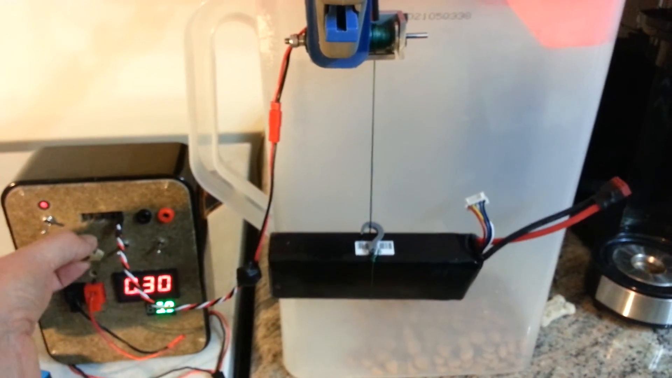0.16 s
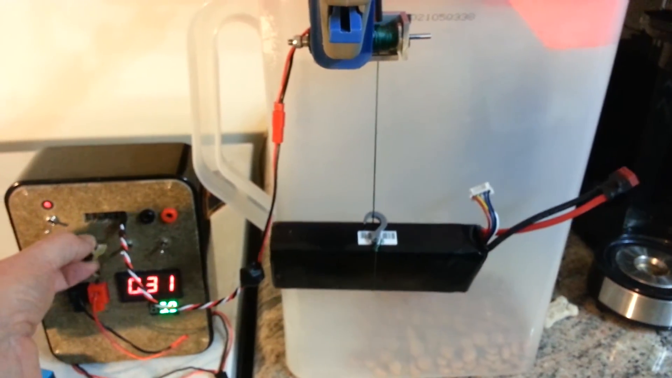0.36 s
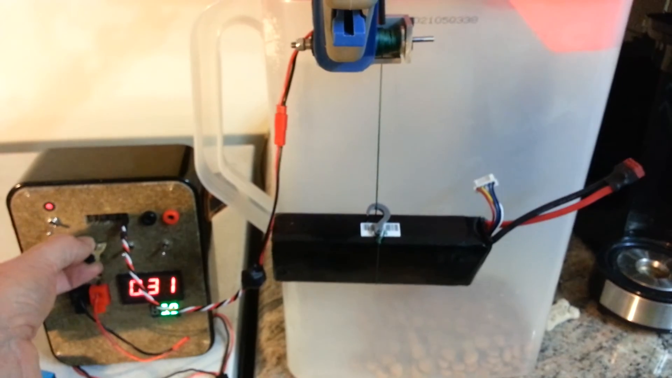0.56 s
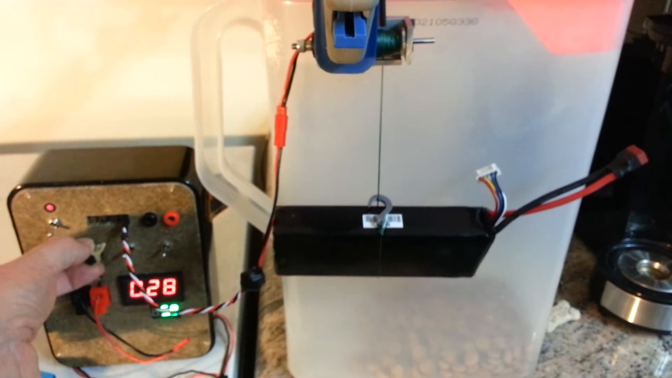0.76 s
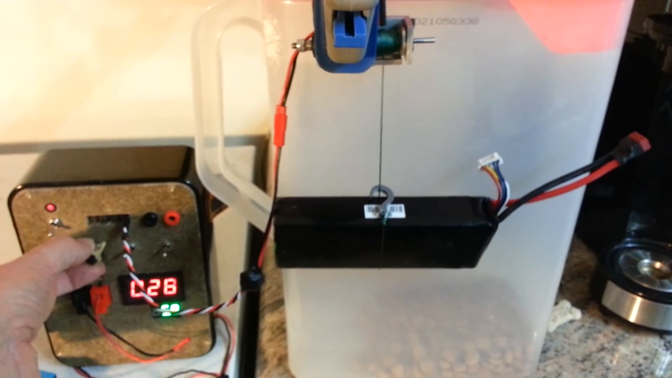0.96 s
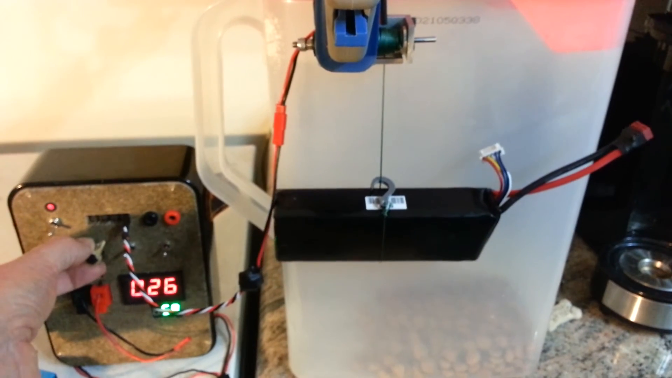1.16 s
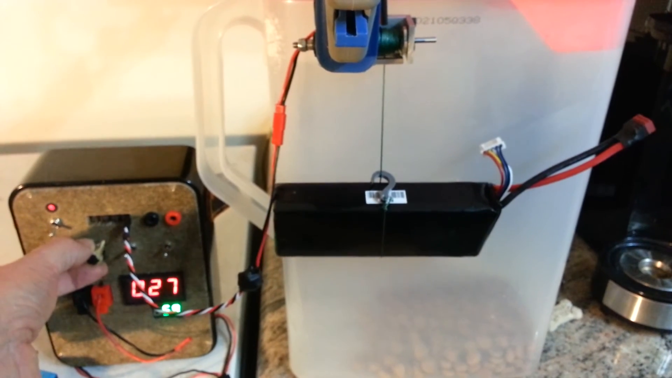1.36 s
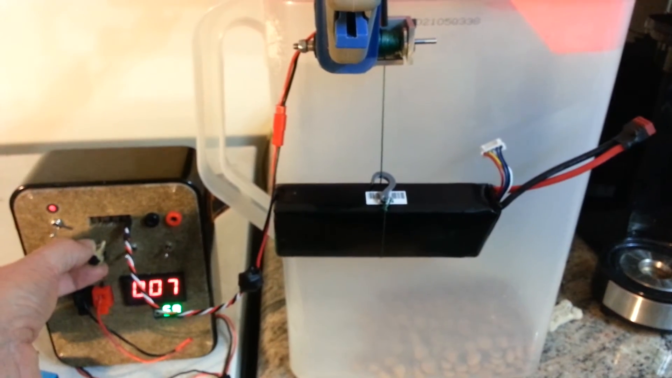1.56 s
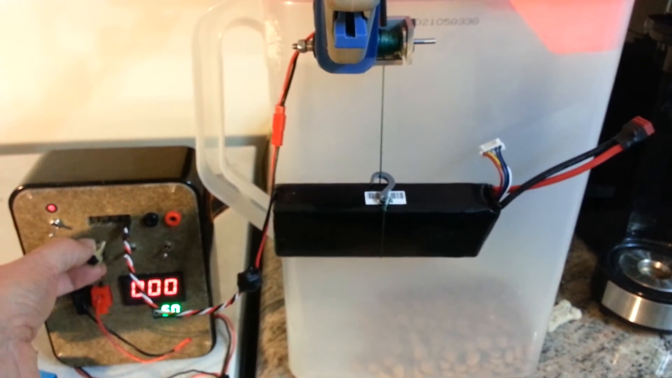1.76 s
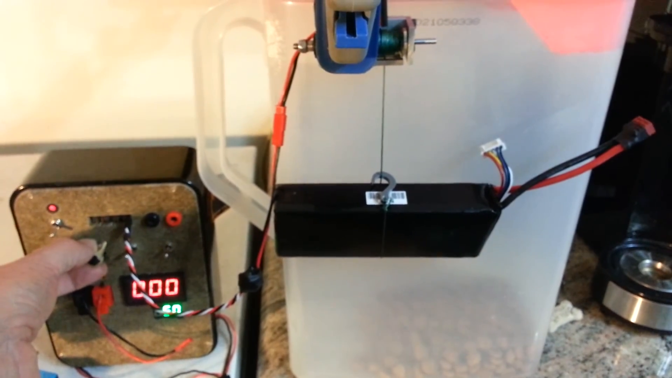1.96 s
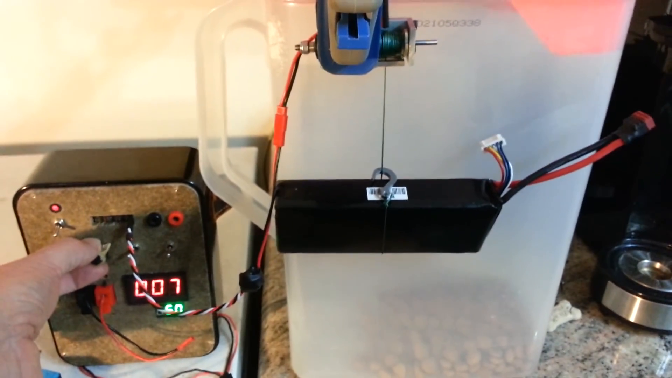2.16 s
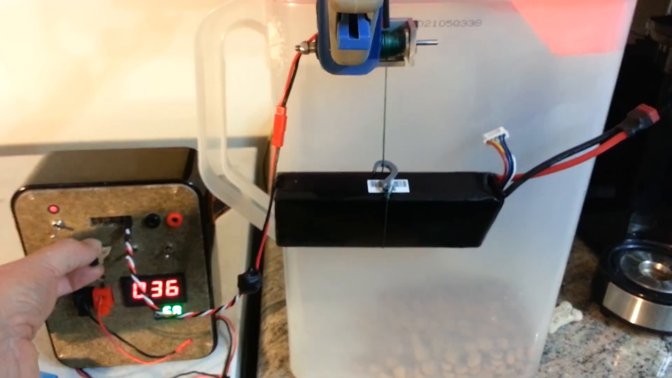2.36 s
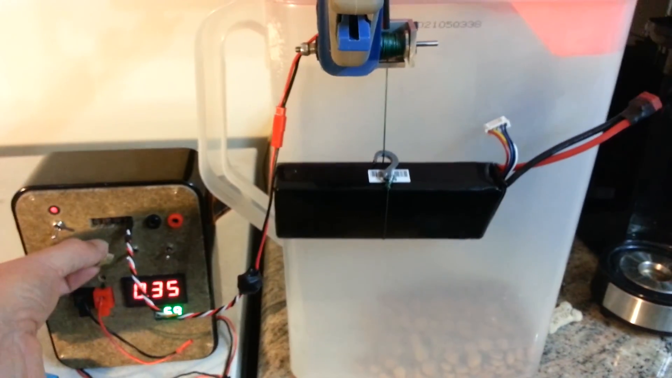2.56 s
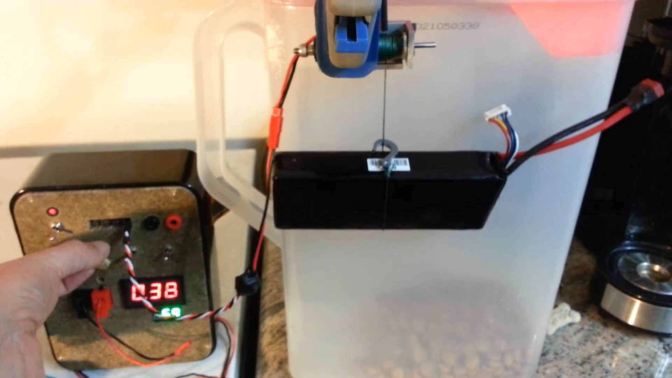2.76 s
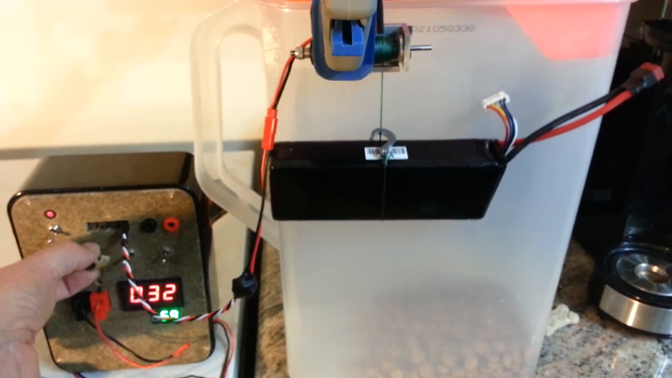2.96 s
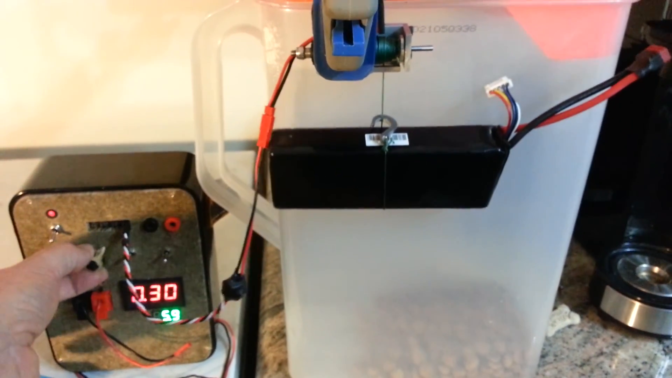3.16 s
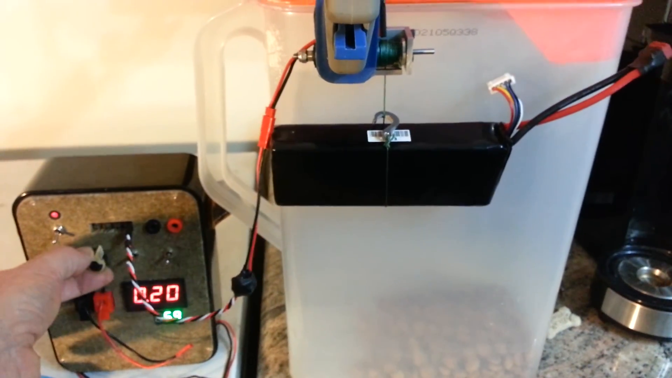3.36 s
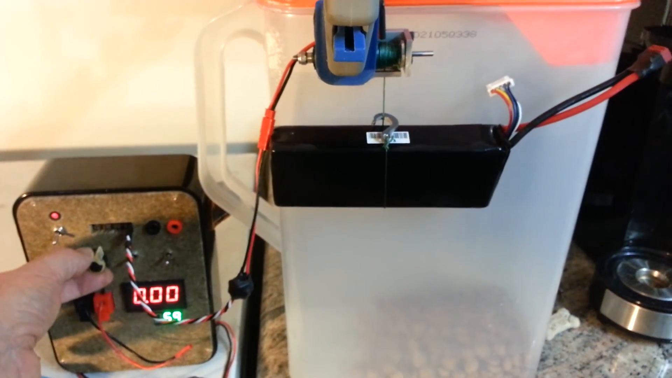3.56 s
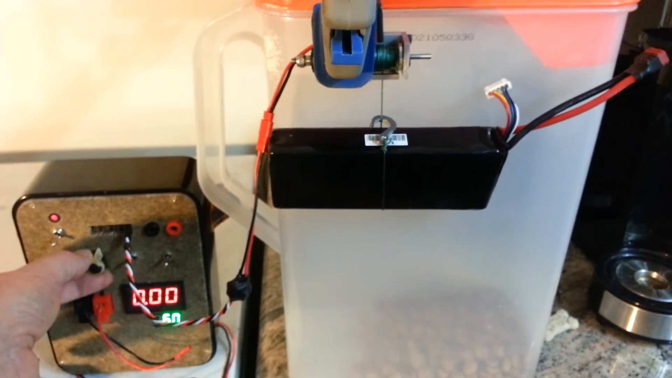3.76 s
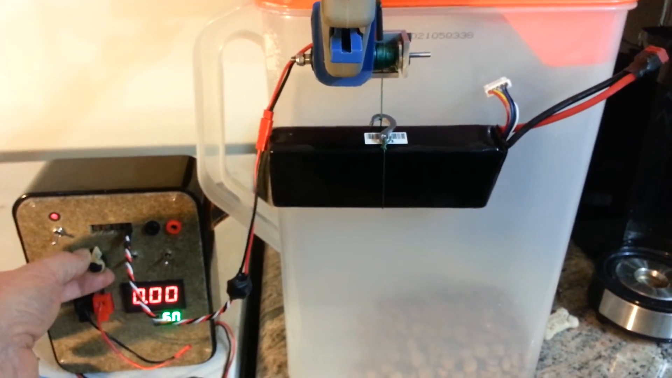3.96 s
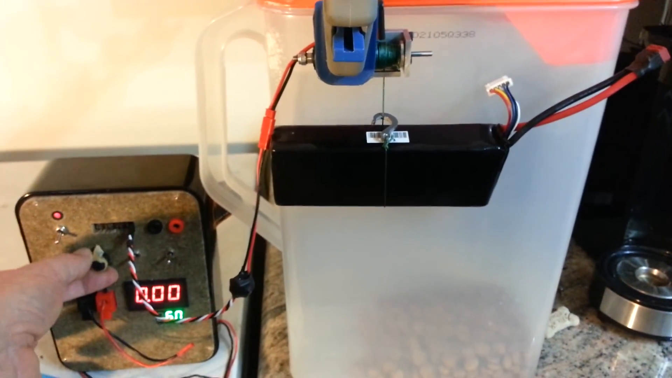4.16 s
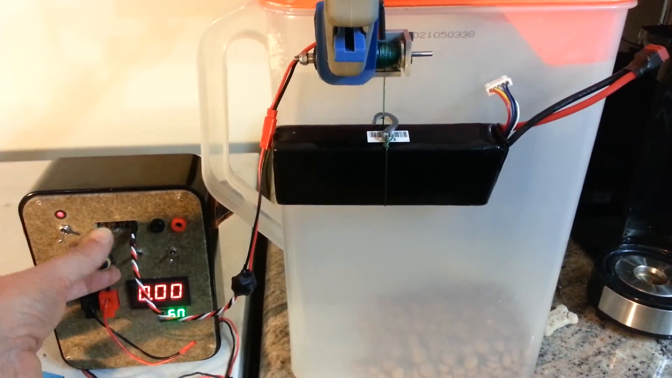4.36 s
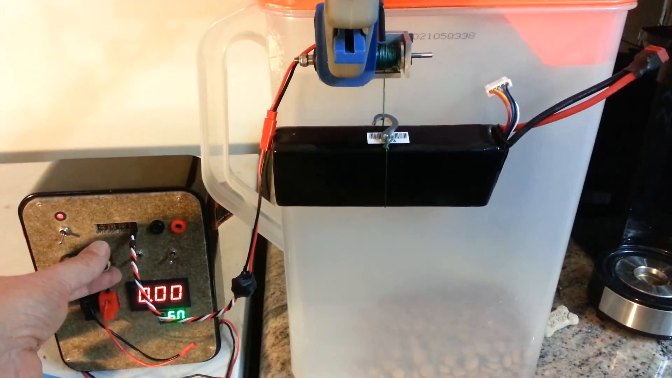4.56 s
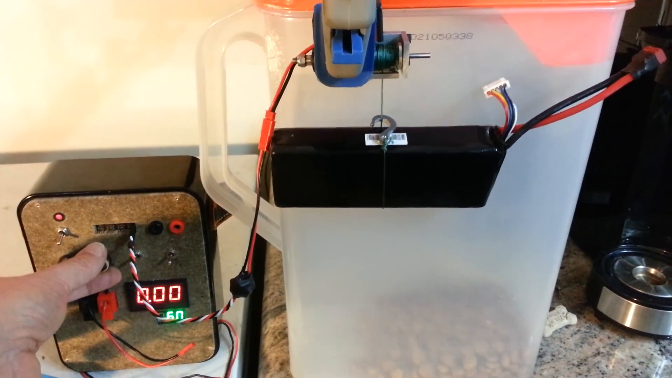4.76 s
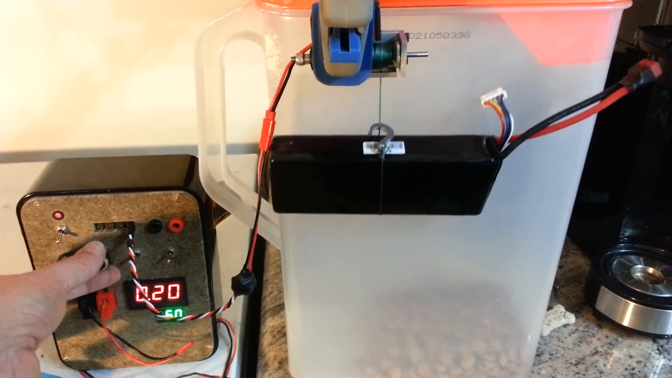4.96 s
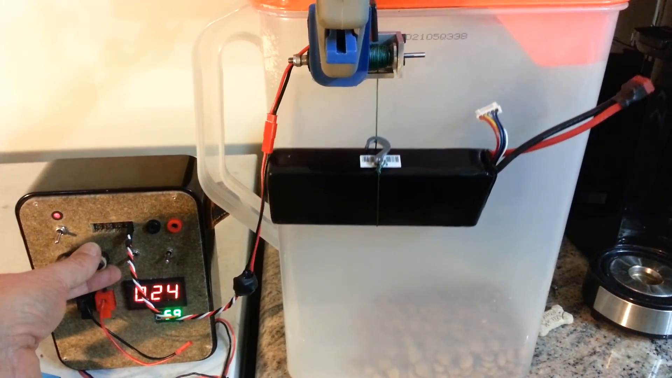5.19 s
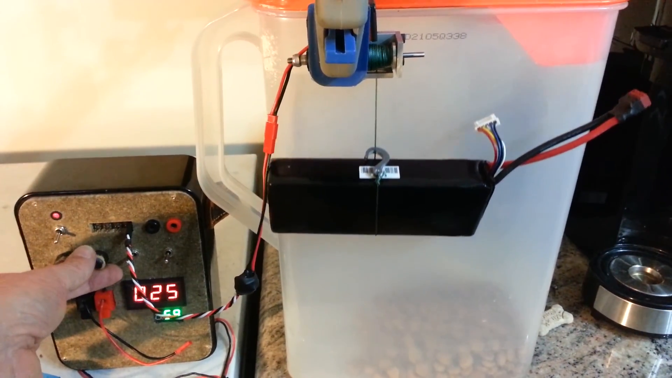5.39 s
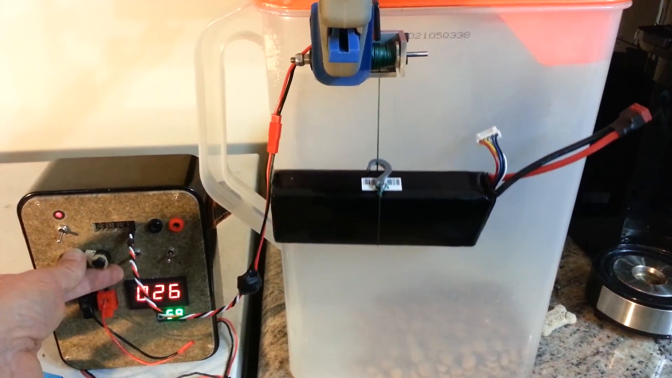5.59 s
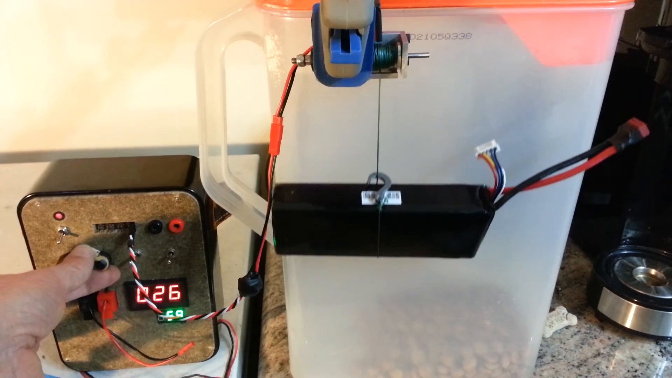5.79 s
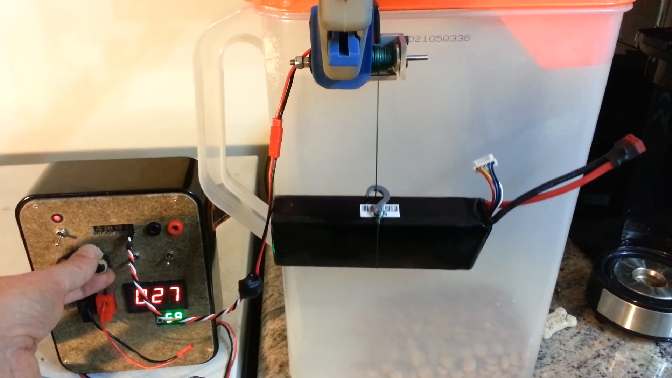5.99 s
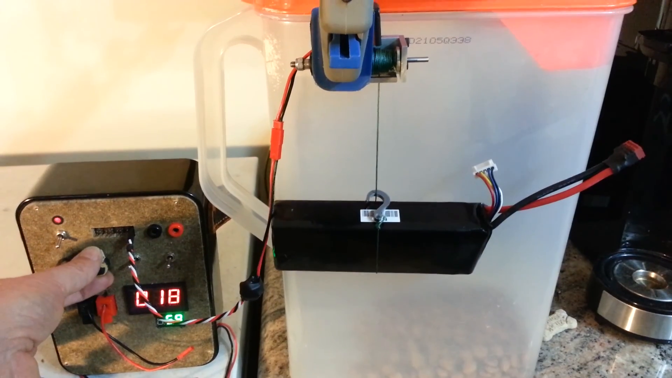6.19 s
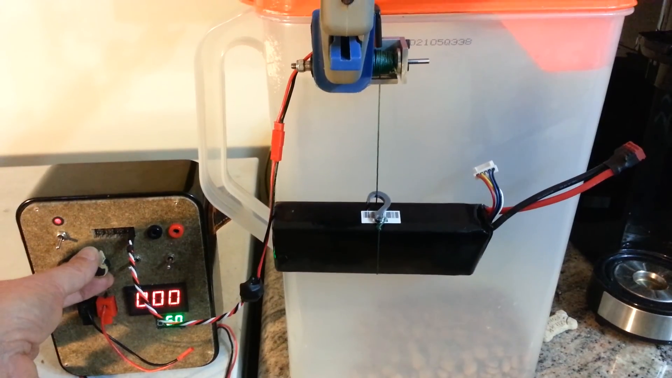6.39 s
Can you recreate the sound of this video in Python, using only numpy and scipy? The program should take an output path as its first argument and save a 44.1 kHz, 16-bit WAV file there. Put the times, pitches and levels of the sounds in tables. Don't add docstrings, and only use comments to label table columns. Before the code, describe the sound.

A small geared electric winch, close to a stereo microphone in a quiet kitchen, is already running at the start with a bright, nasal whine near 3 kHz, dry gear rattle and fine brush hiss. From about 0.5 s its pitch sags in steps, turning into a rough, fluttering buzz, with a faint low bump near 0.8 s, and stops at 1.35 s. Soft appliance hum, room air and a faint once-a-second clock tick remain. At 1.95 s it groans back to life, slow and pulsing, climbs to a steady high whine by 2.7 s, then drops and cuts off at 3.3 s. Quiet follows until 4.73 s, when it runs the other way: louder, looser, more clattering, rising to a high whine by 5.5 s, a small dull knock around 5.6 s, then falling quickly and stopping at 6.1 s. Short room echoes fade into quiet.

```python
import sys
import numpy as np
from scipy import signal
from scipy.fft import rfft, irfft, next_fast_len
from scipy.io import wavfile
from scipy.ndimage import uniform_filter1d

SR = 44100
rng = np.random.default_rng(int(sys.argv[2]) if len(sys.argv) > 2 else 0)


def to_wav(s):
    ch = np.atleast_2d(s).T
    pcm = np.round(np.clip(ch, -1, 1) * 32767)
    wavfile.write(sys.argv[1], SR, pcm.astype(np.int16))


def gain_from_db(level_db):
    decades = np.asarray(level_db, float) / 20
    return 10 ** decades


N = 283563
TIME = np.arange(N) / SR
REVERSE_S = 4
FREE_HZ = 305
PINION_TEETH, SECOND_MESH, WHEEL = 10, 1.64, .49


def rms_one(x):
    return x / np.sqrt(np.mean(x ** 2) + 1e-20)


def by_way(winding, paying):
    return np.where(TIME < REVERSE_S, winding, paying)


def in_time(runs):
    s, value = np.transpose(np.vstack(runs))
    return np.interp(TIME, s, value)


def at_hz(points, hz):
    point_hz, value = np.transpose(points)
    return np.interp(np.log(hz + 1), np.log(point_hz), value)


def resonance(hz, centre_hz, width_hz):
    return 1 / (1 + (2 * (hz - centre_hz) / width_hz) ** 2)


def filtered(x, response):
    size = next_fast_len(N + SR)
    hz = np.arange(size // 2 + 1) * SR / size
    return irfft(rfft(x, size) * response(hz), size)[..., :N]


def causal(gain):
    both_sides = np.log(np.r_[gain, gain[-2:0:-1]])
    phase = np.imag(signal.hilbert(both_sides))[:len(gain)]
    return gain * np.exp(-1j * phase)


def drift(rate):
    r = np.exp(-2 * np.pi * rate * 32 / SR)
    slow = signal.lfilter([1], [1, -2 * r, r * r], rng.standard_normal(N // 32 + 1002))[1000:]
    return np.interp(np.arange(N) / 32, np.arange(len(slow)), rms_one(slow))


def ring(clicks, hz, t60):
    r, w = gain_from_db(-60 / (t60 * SR)), 2 * np.pi * hz / SR
    return signal.lfilter([0, np.sin(w)], [1, -2 * r * np.cos(w), r * r], clicks + 1e-18)


def winch():
    turns_hz, rattle_db = in_time(RUNS), in_time(RATTLE)
    hum_db, tooth_db, octave_db = tones_db(turns_hz)
    idle = np.clip(1 - turns_hz / FREE_HZ, 0, 1)
    speed, angle, cycle, flutter = pulsed_rotor(turns_hz, idle)
    tooth = tooth_whine(angle, tooth_db) * np.clip(turns_hz / 60 - 1.8, 0, 1)
    overtones = tooth_overtones(angle, speed, octave_db) * (1 + 3 * flutter)
    second = second_gear(angle, rattle_db) * (turns_hz / FREE_HZ) ** by_way(6, 2)
    whine = gain_from_db(.3) * tooth + gain_from_db(-.3) * overtones + second
    gears = gain_from_db(-3.5) * rattle(turns_hz, rattle_db, angle, cycle, idle) + groan() + running() * whine
    return gears, running() * gain_from_db(hum_db + 2.5) * np.sin(angle)


# time in seconds, rotor turns per second.
RUNS = [
    [(0.0, 301), (.36, 296), (.52, 284), (.64, 256), (.8, 246), (.96, 230), (.992, 193), (1.26, 188),
     (1.345, 137)],
    [(1.9524, 62), (2.17, 174), (2.33, 204), (2.385, 232), (2.66, 299), (3.0, 303.5), (3.145, 293),
     (3.22, 249), (3.288, 165)],
    [(4.7295, 135), (4.87, 228), (5.1, 249), (5.34, 254), (5.41, 281), (5.53, 291.5), (5.86, 289.5),
     (5.97, 243), (6.088, 182)],
]


def running():
    return sum((TIME >= run[0][0]) * np.clip((run[-1][0] - TIME) / 0.0042 + 1, 0, 1) for run in RUNS)


def pulsed_rotor(turns_hz, idle):
    pulse_hz = 61.45
    starts = np.array([run[0][0] for run in RUNS])
    latest = starts[np.searchsorted(starts, TIME, "right") - 1]
    cycle = (TIME - latest) * pulse_hz % 1
    flutter = by_way(.19, .18) * idle * signal.sawtooth(2 * np.pi * cycle, .22)
    speed = turns_hz * (1 + flutter + by_way(.002, .01) * drift(40))
    angle = 2 * np.pi * np.cumsum(speed) / SR
    return speed, angle, cycle, flutter


# rotor turns per second, rotor hum in dB, tooth whine in dB,
# its octave in dB winding in, its octave in dB paying out.
RADIATION = [(136, -69, -68, -67, -60), (166.7, -64, -63.5, -38, -35), (189, -50, -53, -28, -31),
             (239.5, -50.5, -41.5, -30.5, -26), (253.4, -52.5, -39, -31.5, -25.5),
             (276.8, -43, -41.5, -37.5, -26), (292, -39.5, -34, -46, -29), (301.4, -37.5, -31, -43.5, -30)]


def tones_db(turns_hz):
    at, *columns = np.transpose(RADIATION)
    hum_db, tooth_db, in_db, out_db = [np.interp(turns_hz, at, c) for c in columns]
    return hum_db + by_way(0, -4.5), tooth_db + by_way(0, 1), by_way(in_db, out_db)


def line(order, angle, db, waver_db):
    level = gain_from_db(db + waver_db * drift(35))
    return level * np.sqrt(2) * np.sin(order * angle + rng.uniform(0, 6.25))


SIDEBAND_ORDERS = [0, -1, 1, -SECOND_MESH, SECOND_MESH, 2 * SECOND_MESH, 3 * SECOND_MESH, -WHEEL, WHEEL]
# level in dB winding in, level in dB paying out.
SIDEBANDS = [(0, 0), (-24, -20), (-9, -9), (-22, -20), (-9, -12), (-13, -3), (-15, -6), (-25, -14),
             (-12, -8)]


def tooth_whine(angle, tooth_db):
    return sum(line(PINION_TEETH + off, angle, tooth_db + by_way(in_db, out_db), 2.5 if off else .8)
               for off, (in_db, out_db) in zip(SIDEBAND_ORDERS, SIDEBANDS))


# distance in rotor multiples, level in dB.
OVERTONE_SIDEBANDS = [(0, 0), (-SECOND_MESH, -14), (SECOND_MESH, -16), (-WHEEL, -10), (WHEEL, -10)]
# frequency in Hz, level in dB.
THIRD = [(3000, 4.5), (5000, 2), (6000, -18), (7200, -13), (9000, -42.5)]


def tooth_overtones(angle, speed, octave_db):
    third_db = octave_db + at_hz(THIRD, 3 * PINION_TEETH * speed)
    total = 0
    for off, db in OVERTONE_SIDEBANDS:
        slack_db = by_way(0, 5 * bool(off))
        total = total + line(2 * PINION_TEETH + off, angle, octave_db + db + slack_db, by_way(0.96, 3.5))
        total = total + line(3 * PINION_TEETH + off, angle, third_db + db, 3.3)
    return total


# level in dB winding in, level in dB paying out.
SECOND_GEAR_DB = [(-43, -46), (-31, -35), (-31, -43), (-33, -42)]


def second_gear(angle, rattle_db):
    return sum(line((k + 1) * SECOND_MESH, angle, rattle_db + by_way(*db), 3)
               for k, db in enumerate(SECOND_GEAR_DB))


# frequency in Hz, level in dB per Hz.
CASE = [(300, -20.5), (500, -18), (650, -24.5), (900, -19), (1150, -24), (1450, -19.5), (2000, -13.5),
        (2500, -22), (3200, -5), (5100, 6), (6400, -2), (10200, -24.5), (11100, -30.5), (12300, -29),
        (14300, -76)]
# frequency in Hz, width in Hz, height in dB.
RINGS = [(780, 550, 2.5), (2438, 500, 16.5), (3060, 125, 8), (3350, 240, 7.5), (3648, 68, 10),
         (3968, 144, 8), (4590, 92, 5.5), (5066, 73, 6), (5690, 200, 2.5), (7100, 170, 6)]


def case_gain(hz):
    rings_db = sum(db * resonance(hz, ring_hz, width_hz) for ring_hz, width_hz, db in RINGS)
    return causal(rms_one(gain_from_db(at_hz(CASE, hz) + rings_db)))


# time in seconds, level in dB.
RATTLE = [
    [(0.0, -26.5), (.5, -28), (.96, -29.5), (1.02, -30.5), (1.345, -29.5)],
    [(1.953, -45), (2.04, -31), (2.14, -27.5), (2.32, -28.5), (2.45, -28.5), (3.15, -27), (3.288, -31)],
    [(4.731, -42), (4.8, -28), (4.96, -21), (5.3, -23), (5.4, -22.5), (5.85, -22), (5.97, -23.5),
     (6.088, -27.5)],
]


def rattle(turns_hz, rattle_db, angle, cycle, idle):
    push = 1 + np.clip(1.35 * idle ** 2, 0, .9) * (3 * np.exp(-3.5 * cycle) - 1)
    gate = np.exp(.5 * np.cos(SECOND_MESH * angle) + 0.07 * np.cos(angle) + 0.063 * np.cos(WHEEL * angle))
    knocking = rms_one(rng.standard_normal(N) * gate * push)
    knocking = filtered(running() * gain_from_db(rattle_db + 1.74 * drift(8.5)) * knocking, case_gain)
    low = filtered(knocking, lambda hz: 1 / (1 + (hz / 1760) ** 4))
    share_gone = by_way(0, 0.28) + 0.0036 * (turns_hz - 200)
    return knocking - np.clip(share_gone, -.4, .8) * low


def groan():
    since = [TIME - run[0][0] for run in RUNS[1:]]
    swell = sum(np.clip(t / 0.019, 0, 1) * np.exp(-(np.maximum(t, 0) / 0.15) ** 2) for t in since)
    tone = filtered(rng.standard_normal(N), lambda hz: resonance(hz, 836, 240))
    return gain_from_db(-57) * swell * rms_one(tone)


# frequency in Hz, level in dB per Hz.
BRUSHES = [(5000, -18), (7000, -19), (9500, -7.5), (10800, -11), (12000, -2.5), (13500, -29.5)]


def brushes():
    level_db = by_way(-51, -57) + 30 * np.log10(in_time(RUNS) / FREE_HZ)
    hiss = filtered(rng.standard_normal((2, N)), lambda hz: gain_from_db(at_hz(BRUSHES, hz)))
    return running() * gain_from_db(level_db) * rms_one(hiss)


# time in seconds, level in dB, frequency in Hz, time to fade by 60 dB in seconds.
KNOCKS = [
    (.787, -31, 250, 0.028),
    (5.636, -34.5, 336, 0.052),
    (5.633, -31.5, 1700, 0.016),
]


def knocks():
    return sum(-gain_from_db(db) * ring(np.arange(N) == round(s * SR), hz, t60) for s, db, hz, t60 in KNOCKS)


# frequency in Hz, left minus right in dB.
SIDE_DB = [(60, 7), (110, -2.5), (200, -22), (370, -29), (670, 11.5), (1230, -13.5), (2260, 3),
           (4130, -3.5), (7570, 0.5), (13800, 36)]


def to_ports(x):
    side = np.array([[.5], [-.5]])
    lag_s = 2.5 / SR
    return filtered(x, lambda hz: gain_from_db(side * at_hz(SIDE_DB, hz)) * np.exp(-2j * np.pi * hz * side * lag_s))


# frequency in Hz, level in dB.
ROOM = [(200, -22), (600, 5.5), (1200, 2.5), (2500, -2.5), (5000, -14), (8000, 0.5), (12000, 6.5)]


def kitchen(x):
    t = TIME[:SR // 2]
    tail = rng.standard_normal((2, len(t))) * gain_from_db(-60 * t / 0.26) * (t > .003)
    tail = tail / np.sqrt(np.sum(tail[0] ** 2))
    echoes = signal.fftconvolve(x[None], tail, axes=1)[:, :N]
    return filtered(echoes, lambda hz: gain_from_db(at_hz(ROOM, hz)))


# frequency in Hz, level in dB, time to fade by 60 dB in seconds.
CLOCK = [(1000, -9, .04), (2385, -5, .018), (3200, -7, .012), (4000, -5, .015), (5420, -7, .012),
         (6800, -5, .012)]


def clock():
    first_s, every_s, scratch_s = .597, 1.0, 0.045
    since = (TIME - first_s) % every_s / scratch_s
    swell = np.sqrt(np.sin(np.pi * np.minimum(since, 1) ** 0.4).clip(0))
    scratch = gain_from_db(-60.5) * swell * rng.standard_normal(N)
    direct = filtered(scratch, lambda hz: 1 / (1 + (1500 / (hz + 1)) ** 4) / (1 + (hz / 7500) ** 8))
    return direct + gain_from_db(-16) * sum(gain_from_db(db) * ring(scratch, hz, t60) for hz, db, t60 in CLOCK)


# frequency in Hz, width in Hz, level in dB.
HUM = [(59.2, 4, -69), (237, 8, -71), (388, 5, -65), (474, 6, -72), (2374, 10, -87), (3870, 50, -87),
       (5098, 15, -81)]


def appliances():
    total = 0
    for tone_hz, width_hz, db in HUM:
        tone = filtered(rng.standard_normal(N), lambda hz: resonance(hz, tone_hz, width_hz))
        total = total + gain_from_db(db) * rms_one(tone)
    return total


# frequency in Hz, level in dB per Hz.
AIR = [(15, -51), (25, -41), (49, -10), (152, -10), (227, -3.5), (259, -7), (386, -3), (418, -7.5),
       (477, -13.5), (856, -19), (1120, -19.5), (1460, -22.5), (4940, -26), (6110, -30), (14300, -29)]
# frequency in Hz, likeness from 0 to 1.
LIKENESS = [(60, 0.24), (180, 0.63), (530, 0.59), (1570, 0.056), (4660, 0.018), (13800, 0.01)]


def air():
    mid, side = rng.standard_normal((2, N))
    alike = lambda hz: np.clip(at_hz(LIKENESS, hz), 0, 1)
    mid = filtered(mid, lambda hz: gain_from_db(at_hz(AIR, hz)) * np.sqrt(1 + alike(hz)))
    side = filtered(side, lambda hz: gain_from_db(at_hz(AIR, hz)) * np.sqrt(1 - alike(hz)))
    return gain_from_db(-56) * rms_one(np.array([mid + side, mid - side]))


def scene():
    gears, hum = winch()
    ticks = clock()
    close = to_ports(gears) + hum + knocks() + brushes()
    echoes = kitchen(gears + hum + gain_from_db(2.5) * ticks)
    return close + echoes + gain_from_db(-1.5) * ticks + appliances() + air()


def starved(x):
    hz, _, frames = signal.stft(x, SR, nperseg=2048, noverlap=1536)
    power = np.mean(np.abs(frames) ** 2, axis=0)
    band = np.abs(uniform_filter1d(uniform_filter1d(power, size=5, axis=0), size=4, axis=1))
    band[hz < 140] = band[hz < 140].max(axis=0)
    band_db = 10 * np.log10(band / power.sum(axis=0) + 1e-12)
    limit_db = np.select([hz < 140, hz < 2000, hz > 10000], [-44, -50, -49], -90)[:, None]
    keep = .03 + .97 / (1 + gain_from_db(8 * (limit_db - band_db)))
    return signal.istft(frames * keep, SR, nperseg=2048, noverlap=1536)[1][:, :N]


def low_pass(x):
    return signal.sosfilt(signal.butter(12, 14450, fs=SR, output="sos"), x)


def record(dry):
    cut = signal.sosfilt(signal.cheby2(12, 60, 15350, fs=SR, output="sos"), dry)
    return low_pass(starved(cut))


dry = scene()
out = record(dry)
to_wav(out)
```